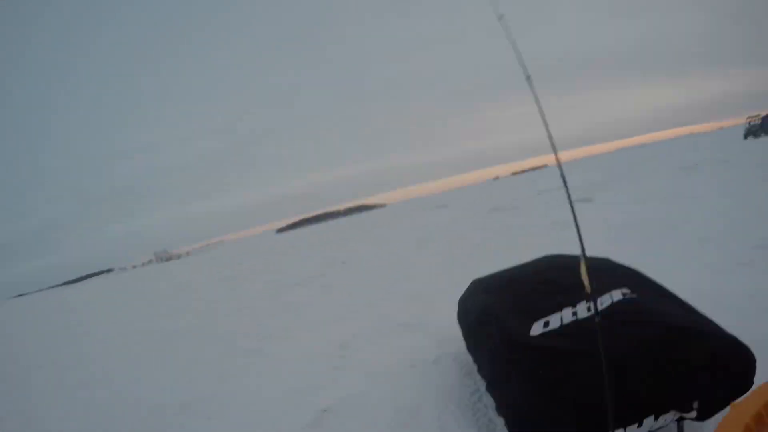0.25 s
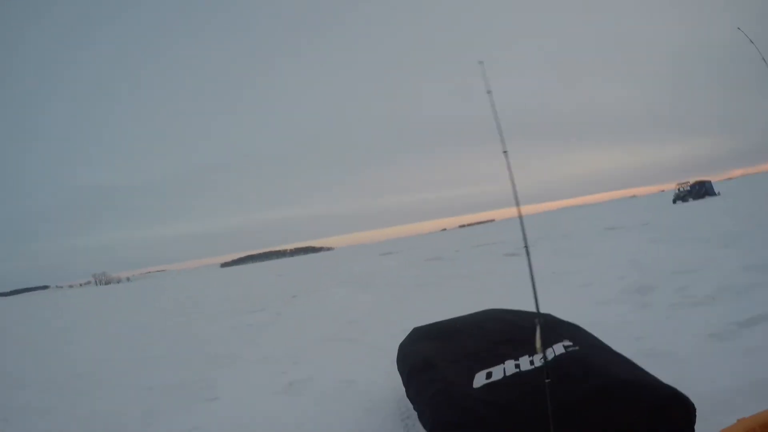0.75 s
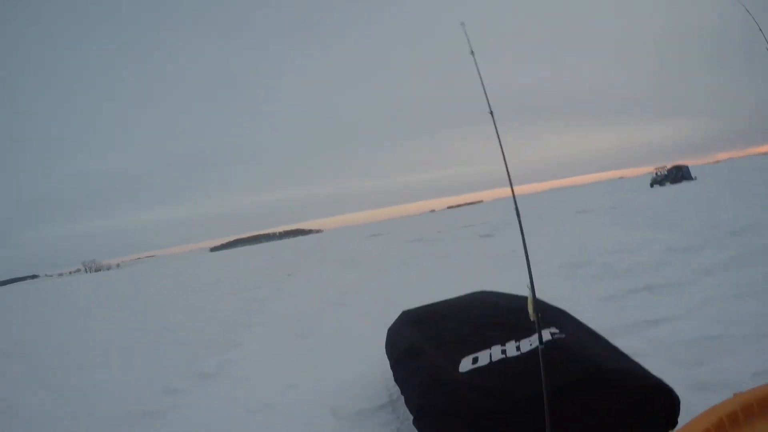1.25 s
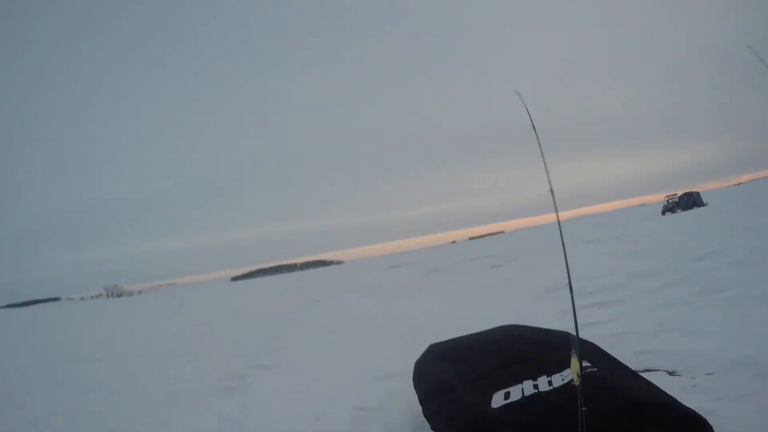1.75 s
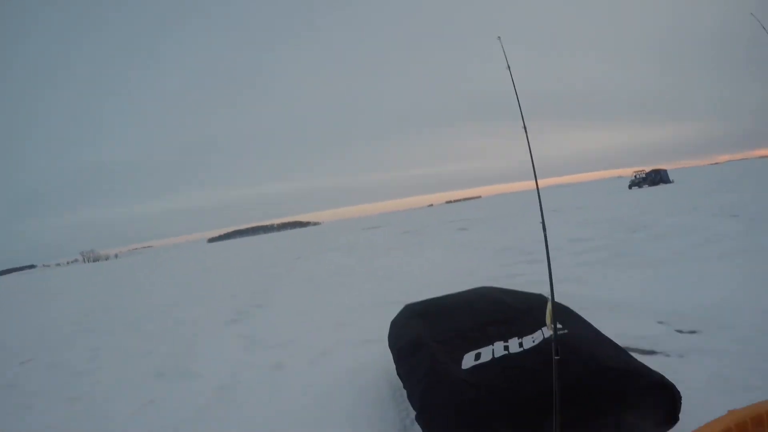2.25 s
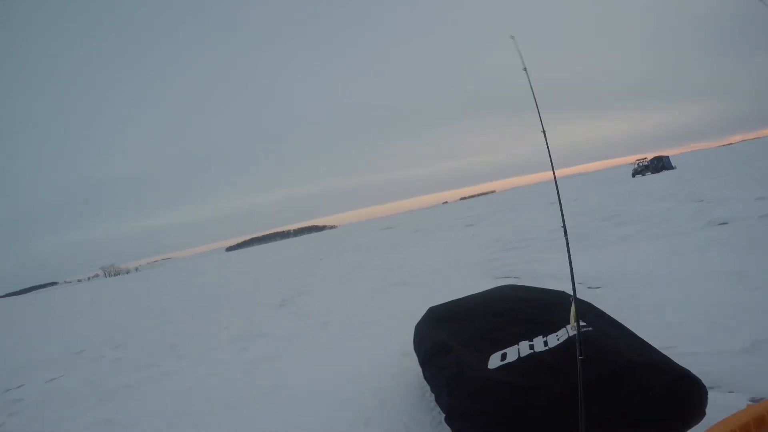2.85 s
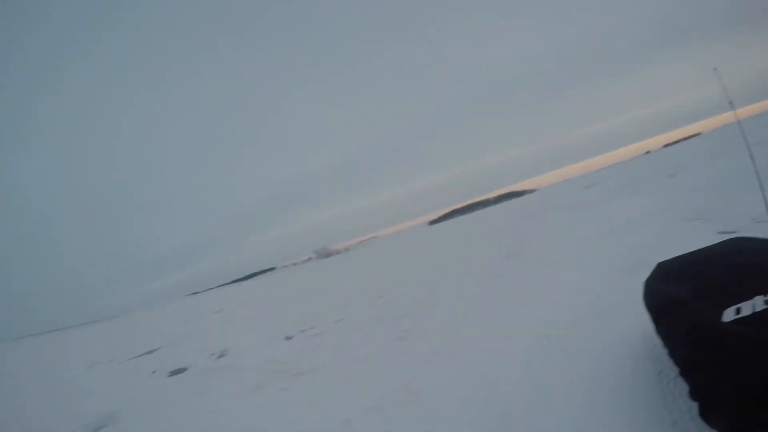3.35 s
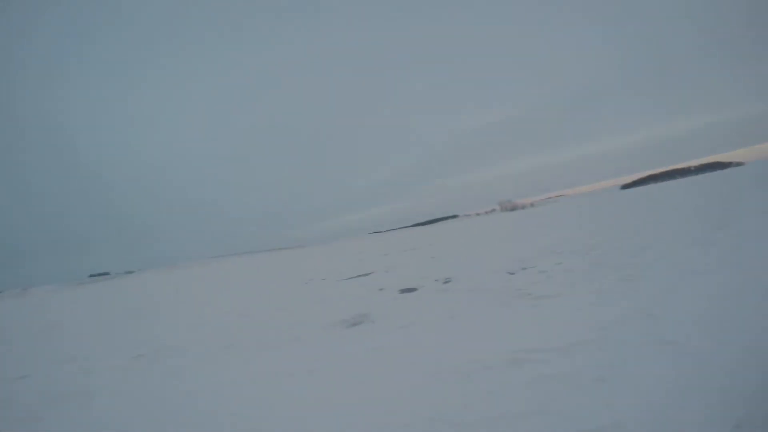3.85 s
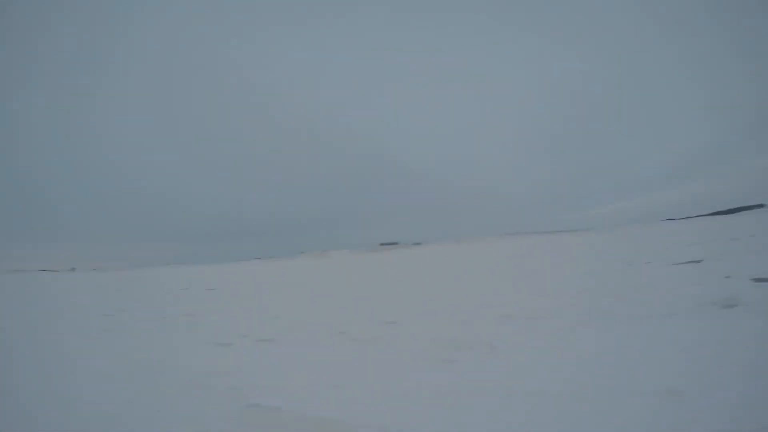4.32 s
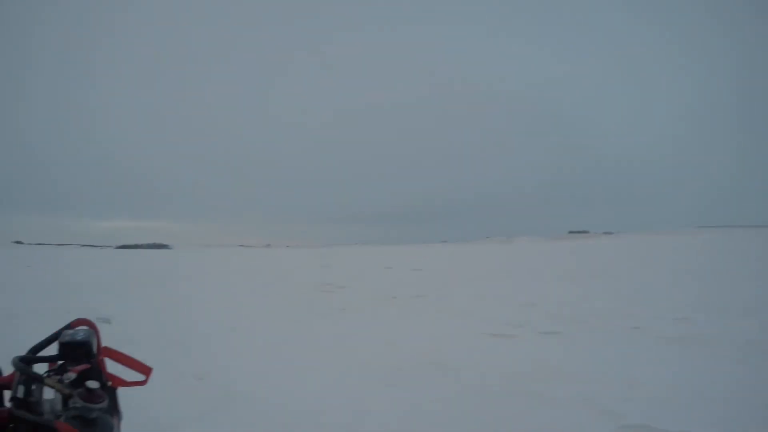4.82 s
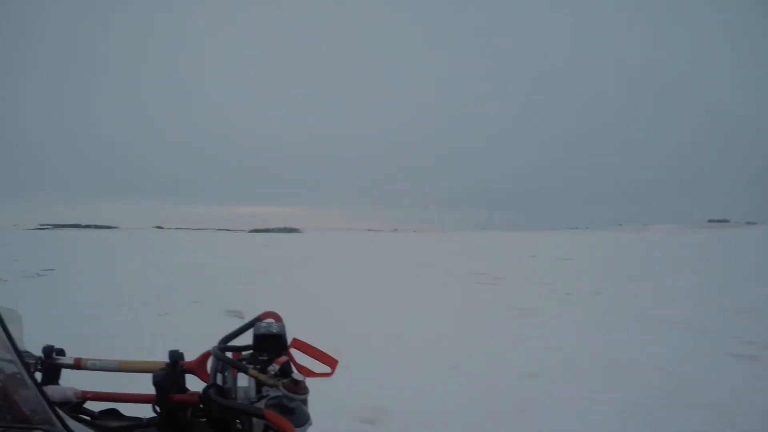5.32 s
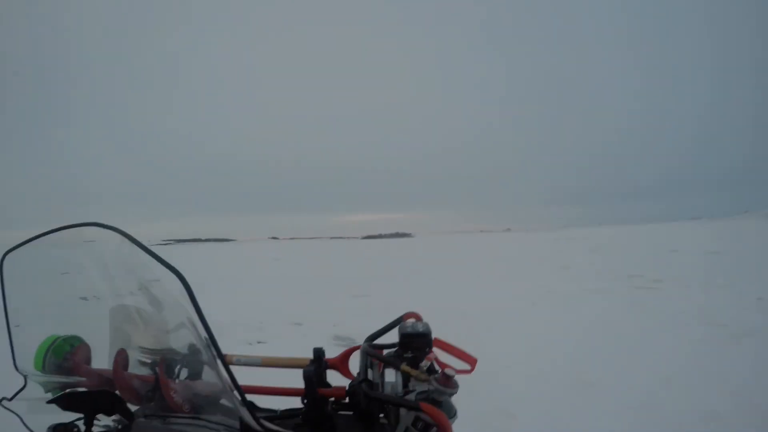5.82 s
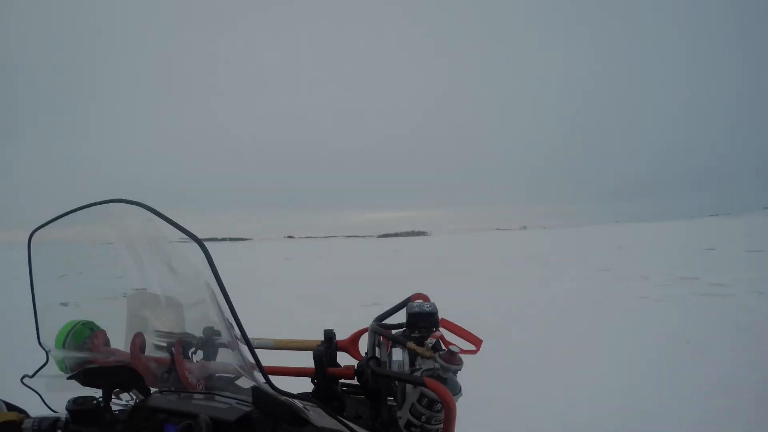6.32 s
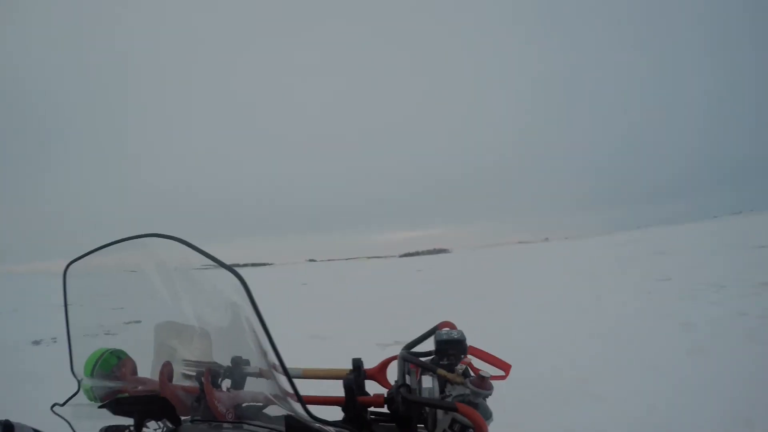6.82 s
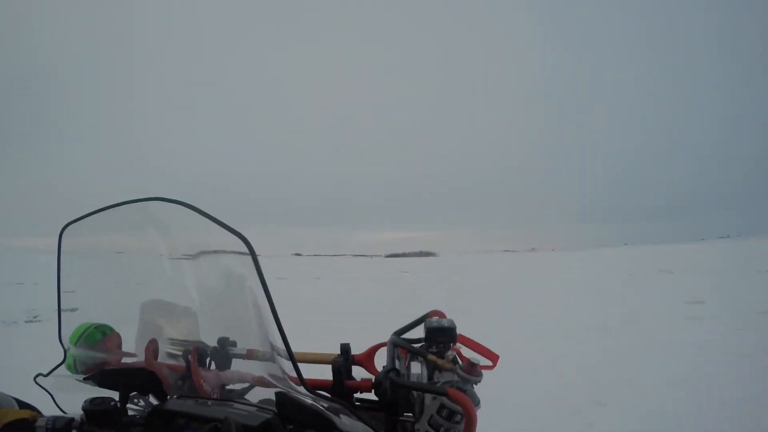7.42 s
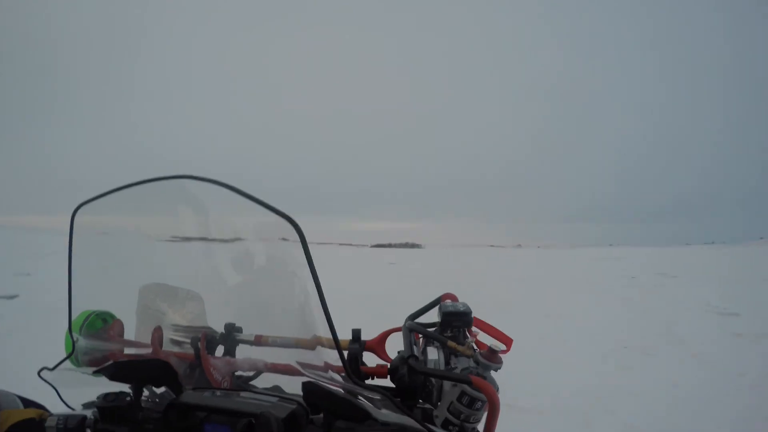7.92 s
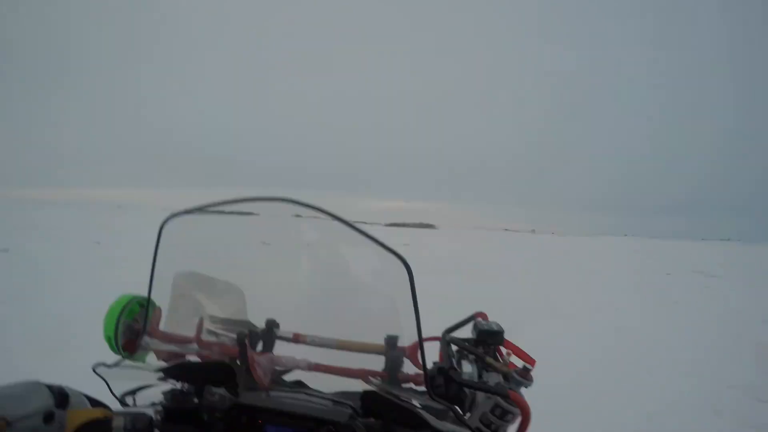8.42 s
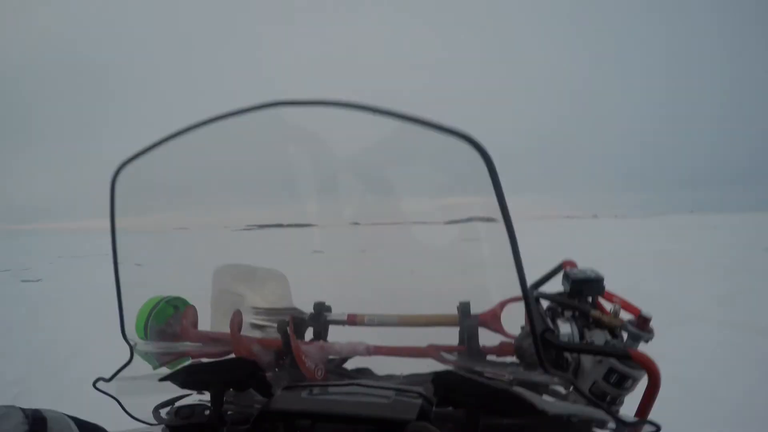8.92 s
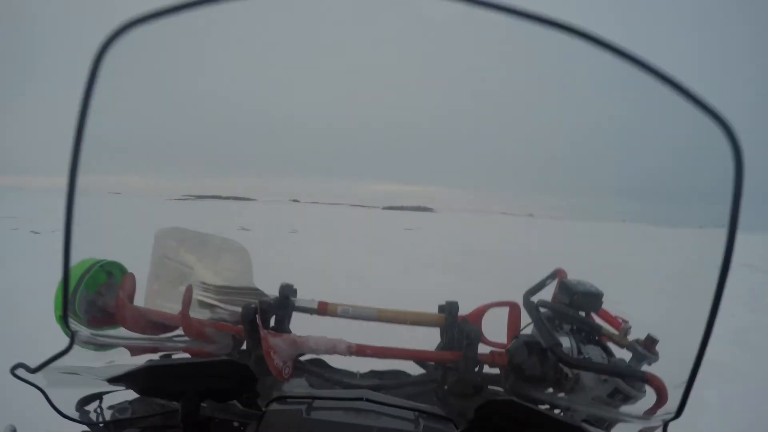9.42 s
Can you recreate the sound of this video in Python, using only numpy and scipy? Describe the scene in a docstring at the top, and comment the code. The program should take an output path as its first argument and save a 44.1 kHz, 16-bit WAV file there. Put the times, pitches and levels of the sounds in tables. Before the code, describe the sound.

Steady rough snowmobile idle creeping slightly upward, heard through a muffled body-worn microphone with wind rumble, clothing rustle and sharp handling knocks on its case.

```python
"""A snowmobile engine idles and slowly picks up speed, heard by a cased microphone worn on the head.
Exhaust and whine are summed multiples of the firing rate; puff and metal clatter are noise pulsing with it.
The wearer turns towards the machine. Wind and movement rumble in the case and clothing rustles: shaped noise.
Knocks, scrapes and taps on the plastic housing excite its resonances; ticks are short decaying sines."""
import sys
import numpy as np
from scipy import signal
from scipy.fft import rfft, irfft, next_fast_len
from scipy.io import wavfile
from scipy.ndimage import uniform_filter1d, minimum_filter1d, map_coordinates

SR = 44100
rng = np.random.default_rng(int(sys.argv[2]) if len(sys.argv) > 2 else 0)


def transcribe(u):
    """Save the signal u as a 16-bit wav file named by the first command-line argument.

    u: samples, shape (n,) or (channels, n), limited to [-1, 1]; the rate is SR.
    q: integer samples, one column per channel.
    """
    v = np.clip(np.atleast_2d(u).T, -1, 1)
    q = np.round(v * 32767).astype(np.int16)
    wavfile.write(sys.argv[1], SR, q)


N = 426005


def amp(db):
    """Decibels to gain."""
    return 10 ** (np.asarray(db) / 20)


def unit(x):
    """Scaled to rms 1."""
    return x / np.sqrt(np.mean(x ** 2) + 1e-20)


def curves(rows):
    """One value per sample for each column after the time."""
    time_s, *columns = np.transpose(rows)
    return [np.interp(np.arange(N) / SR, time_s, column) for column in columns]


def wobble(rate_hz, step=1):
    """Smooth random curve, rate_hz knots a second, one value every step samples."""
    coarse = np.arange(0, N + 128, 128)
    knots = rng.standard_normal(int(N * rate_hz / SR) + 4)
    smooth = map_coordinates(knots, [coarse * rate_hz / SR])
    return np.interp(np.arange(0, N, step), coarse, smooth)


def filtered(x, response):
    """x filtered by a complex response of frequency."""
    size = next_fast_len(N + SR // 2)
    return irfft(rfft(x, size) * response(np.fft.rfftfreq(size, 1 / SR)), size)[:N]


def modes(table):
    """Causal response of a set of resonances, alternating in sign."""
    def response(f):
        total = 0
        for k, (center_hz, width_hz, db) in enumerate(table):
            damping = 1j * f * width_hz
            total = total + (-1) ** k * amp(db) * damping / (center_hz ** 2 - f * f + damping)
        return total
    return response


def rush(spectrum, patchy_db, gate=1):
    """Gated, spectrally shaped noise of rms 1 with time-frequency patches of random gain."""
    z = signal.stft(rng.standard_normal(N + 512), nperseg=512)[2]
    field = uniform_filter1d(rng.standard_normal(z.shape), 5, 0)
    field = uniform_filter1d(field, 12, 1)
    x = signal.istft(z * amp(patchy_db * unit(field)), nperseg=512)[1][:N] * gate
    f, db = np.transpose(spectrum)
    return unit(filtered(x, lambda hz: amp(np.interp(np.log(hz + 1), np.log(f + 1), db))))


def swell(start_s, length_s, edge_s):
    """Sample numbers and gain of a soft rise, hold and fall."""
    first = max(0, round((start_s - edge_s) * SR))
    last = min(N, round((start_s + length_s + edge_s) * SR))
    at = np.arange(first, last)
    ramp = np.minimum(at / SR - start_s, start_s + length_s - at / SR) / edge_s
    return at, np.sin(np.pi / 4 * (np.clip(ramp, -1, 1) + 1)) ** 2


def bursts(rows, rest_db, edge_s):
    """Gain curve: swells added in power to a resting level."""
    power = np.full(N, amp(rest_db) ** 2)
    for start_s, length_s, db in rows:
        at, gain = swell(start_s, length_s, edge_s)
        power[at] += (amp(db) * gain) ** 2
    return np.sqrt(power)


# wind rumble spectrum: (frequency [Hz], relative density [dB])
RUMBLE_SPECTRUM = [(4.7, -36), (8.0, 4), (38, 0.5), (70, -13.5), (81, -22), (108, -18.5), (140, -27),
                   (180, -63), (310, -120)]
# gusts on the case: (start [s], length [s], rumble level [dB])
GUSTS = [(0.085, 0.21, -21), (0.34, 0.116, -21), (0.743, 0.079, -20.5), (1.16, 0.048, -19),
         (1.522, 0.088, -22), (1.721, 0.036, -19), (2.645, 0.04, -26), (3.587, 0.041, -21),
         (3.78, 0.034, -28), (3.877, 0.034, -27.5), (3.932, 0.033, -26), (4.175, 0.05, -22),
         (4.317, 0.038, -28), (4.37, 0.039, -26), (4.536, 0.03, -28), (4.698, 0.084, -26),
         (5.797, 0.04, -23.5), (6.063, 0.12, -21), (6.238, 0.13, -25), (6.432, 0.09, -25),
         (6.612, 0.034, -24), (6.806, 0.17, -20), (7.01, 0.11, -22), (7.26, 0.081, -23),
         (7.394, 0.042, -23), (7.482, 0.074, -27), (7.646, 0.05, -25.5), (7.807, 0.033, -19),
         (8.12, 0.12, -20), (8.458, 0.061, -19.5), (8.666, 0.064, -21), (8.779, 0.055, -20),
         (9.208, 0.12, -24.5), (9.373, 0.04, -23), (9.469, 0.032, -21)]
CALM_DB, GUST_EDGE_S = -31, 0.04


def wind():
    """Low pressure swings on the case, their short-term level partly evened out, then gusted."""
    push = rush(RUMBLE_SPECTRUM, patchy_db=1.4)
    size = np.sqrt(np.abs(uniform_filter1d(push ** 2, SR // 12)) + .05)
    return bursts(GUSTS, CALM_DB, GUST_EDGE_S) * unit(push / size ** 0.53)


# movement noise spectrum: (frequency [Hz], relative density [dB])
SHUFFLE_SPECTRUM = [(40, -42), (85, 1.5), (130, -7.5), (200, -2.5), (330, -18), (600, -25), (1000, -70)]
# body movements: (start [s], length [s], level [dB])
MOVES = [(0, 0.3, -36.5), (1.4, .25, -39), (2.1, .15, -47), (3.42, .15, -46), (6.1, .12, -55),
         (6.78, 0.26, -37), (7.9, 0.26, -44), (8.22, 0.52, -35.5), (8.72, 0.44, -39), (9.55, 0.13, -37)]
REST_DB, MOVE_EDGE_S = -49, 0.048


def movement():
    """Body movement carried through the mount as swells of low noise."""
    return bursts(MOVES, REST_DB, MOVE_EDGE_S) * rush(SHUFFLE_SPECTRUM, patchy_db=1.0)


# fabric hiss spectrum: (frequency [Hz], relative density [dB])
RUSTLE_SPECTRUM = [(2650, -29), (4500, -4), (5660, -4.5), (7040, -1.5), (8060, -9.5), (9870, -9.5),
                   (14900, -27.5), (15600, -29)]
# strokes of fabric: (start [s], length [s], rustle level [dB])
STROKES = [(.33, 0.072, -61), (.46, 0.11, -50), (.63, .05, -50), (.72, .05, -55), (.8, 0.11, -57),
           (1.0, 0.081, -58), (1.13, .1, -60), (1.34, 0.23, -50), (1.62, 0.14, -50.5), (1.84, .22, -52.5),
           (2.14, .06, -51), (2.27, 0.13, -49), (2.45, 0.13, -51.5), (2.7, 0.11, -51), (2.95, .12, -53),
           (3.16, .1, -54), (3.4, .65, -60), (4.25, 0.23, -55), (4.52, 0.71, -56), (5.34, .1, -55),
           (6.17, .1, -57), (6.84, .19, -54.5), (7.95, 0.079, -60)]
# thin scuff spectrum: (frequency [Hz], relative density [dB])
SCUFF_SPECTRUM = [(6500, -60), (8800, -14), (9900, 0), (10800, -12), (12500, -14), (15000, -30)]
# thin, high scuffs: (start [s], length [s], level [dB])
SCUFFS = [(3.16, .17, -59), (3.4, .08, -60), (3.57, .13, -59)]
STILL_DB, STROKE_EDGE_S = -60.5, 0.027


def cloth():
    """Stiff fabric rubbing: bright, grainy hiss in strokes, and a few thinner scuffs."""
    grain = amp(2.0 * wobble(60) + 1.0 * wobble(18))
    hiss = unit(grain * rush(RUSTLE_SPECTRUM, patchy_db=4.0))
    strokes = bursts(STROKES, STILL_DB, STROKE_EDGE_S) * hiss
    scuffs = bursts(SCUFFS, -120, STROKE_EDGE_S) * rush(SCUFF_SPECTRUM, patchy_db=1.5)
    return strokes + scuffs


# tiny high ticks: (time [s], level [dB])
TICKS = [(6.774, -56), (6.8423, -47), (6.8793, -50), (6.9114, -50), (6.9177, -42), (6.9344, -52),
         (6.9546, -50.5), (6.9614, -51), (6.9795, -51), (6.9974, -48), (7.0065, -44), (7.0174, -56),
         (7.0614, -52)]


def ticks():
    """Something small and hard chatters near one high pitch: short decaying sines."""
    out, t = np.zeros(N), np.arange(SR // 100) / SR
    for time_s, db in TICKS:
        envelope = amp(db - 60 * t / 0.015) * (1 - np.exp(-t / .0004))
        pitch_hz = rng.normal(11050, 150)
        out[round(time_s * SR):][:len(t)] += envelope * np.sin(2 * np.pi * pitch_hz * t)
    return out


# housing resonances, low, mid and high: (frequency [Hz], width [Hz], level [dB])
CASE_LOW = [(300, 120, -14), (545, 130, -6.5), (753, 170, 3.5), (1057, 130, 4)]
CASE_MID = [(1306, 266, -2), (1666, 146, 5.5), (2208, 126, -0.5)]
CASE_HIGH = [(2870, 690, 3), (3750, 300, 4.5), (4200, 280, 5.5), (4980, 166, 5), (5766, 163, 5),
             (9400, 1200, -12)]


def housing(low, mid, high):
    """Plastic housing: three resonance groups; soft contact passes little of the top octave."""
    rung = filtered(low, modes(CASE_LOW)) + filtered(mid, modes(CASE_MID)) + filtered(high, modes(CASE_HIGH))
    return filtered(rung, lambda hz: 1 / (1 + 1j * hz / 11000) ** 4)


# light taps: (time [s], level [dB])
TAPS = [(0.477, -22), (0.6853, -23.5), (1.598, -19.5), (1.64, -30.5), (9.151, -13), (9.45, -20)]
# light rubbing: (start [s], length [s], level [dB])
RUBS = [(6.101, 0.15, -49), (6.367, .045, -42), (6.459, .15, -46)]
TAP_S = .0015  # hold, and each edge
SCRAPE_EDGE_S = .012


def taps():
    """Fingertips tap and rub the housing gently; only its strongest mid mode answers."""
    push = np.zeros(N)
    mode_hz = CASE_MID[1][0]
    for time_s, db in TAPS:
        at, gain = swell(time_s, TAP_S, TAP_S)
        push[at] += amp(db) * gain * np.sin(2 * np.pi * mode_hz * (at / SR - time_s))
    for start_s, length_s, db in RUBS:
        at, gain = swell(start_s, length_s, SCRAPE_EDGE_S)
        slips = rng.standard_normal(len(at)) * (rng.random(len(at)) < .02)
        push[at] += amp(db + 29.5) * gain * slips
    return filtered(push, modes(CASE_MID[1:2]))


# drags over the housing: (start [s], length [s], scrape level [dB], treble relative to scrape [dB])
SCRAPES = [(0.196, 0.072, -46, 0), (0.294, 0.08, -51, -6), (.375, 0.026, -36, -7), (0.407, .05, -47, -16),
           (0.473, .08, -50, 4), (1.495, 0.036, -41.5, -8), (4.035, .025, -56, 10),
           (8.255, 0.066, -44.5, -17), (8.401, .06, -47, -9), (8.519, 0.056, -41, -10),
           (8.568, .045, -34, -18), (8.622, 0.033, -24, -10), (8.689, 0.061, -36, -12),
           (8.75, .04, -44, -12), (8.799, 0.025, -32, -21)]


def scrapes():
    """Stick and slip: sparse spikes of uneven size ring the housing."""
    body, treble = np.zeros((2, N))
    for start_s, length_s, db, treble_db in SCRAPES:
        at, gain = swell(start_s, length_s, SCRAPE_EDGE_S)
        spikes = rng.standard_normal(len(at)) * (rng.random(len(at)) < .03)
        slips = spikes * gain * amp(db + 29.5)
        body[at] += slips
        treble[at] += amp(treble_db) * slips
    return housing(body, body, treble)


# knocks: (time [s], level [dB], low modes re level [dB], treble re level [dB],
#          thump level [dB], contact time scale [s])
KNOCKS = [(0.173, -39, -13, 9.5, -31, 0.0033), (0.2922, -8, -10, 2.5, -32, 0.0023),
          (0.2979, -14, -20, -4.5, -32, 0.0062), (0.381, -21, -16, -10, -25, 0.0026),
          (0.3882, -18, -16, -19, -45, 0.0033), (0.455, -29, -16, -18, -37, 0.002),
          (0.4652, -19.5, -19, -10, -40, 0.0029), (1.493, -27, -16, -19, -23.5, 0.002),
          (6.6064, -31, -15.5, -24, -23, 0.0022), (6.6269, -3, -12.5, -23, -16.5, 0.0018),
          (6.8398, -36, -3, -14, -25, 0.0018), (7.8235, -28, -1.5, -21, -21, 0.0025),
          (8.502, -27.5, -6, -16, -29, 0.0022), (8.538, -14, -12, -15.5, -31, 0.003),
          (8.587, -25, 0, -22, -23, 0.0027), (8.5967, 4, -11, -12, -30, 0.0043),
          (8.6162, -7.5, -6, -16, -20, 0.0051), (8.6242, -11.5, -4, -1, -17, 0.006),
          (8.6324, -9, -7, -3, -14, 0.0025), (8.637, -12, -9, 1, -13.5, 0.0037),
          (8.6435, -14, -9, -6, -22, 0.003), (8.6884, -18, -9, -18, -32.5, 0.002),
          (8.7004, -11.5, -16, -9.5, -33, 0.0027), (8.7104, -20, -7, -4, -32, 0.002),
          (8.7145, -13, -11, -2, -41, 0.003), (8.7217, -13.5, -4, -7, -28, 0.0032),
          (8.736, -13, -12, -13, -14.5, 0.0026), (8.7494, -17, -16, -12, -34, 0.002),
          (8.757, -14, -13, -19, -35, 0.002), (8.763, -26, -6, -8, -35, 0.002),
          (8.776, -27, -3, -20, -34, 0.002), (8.7884, -15, -6, -8, -34, 0.0046),
          (8.7994, -7.5, -6, 0.5, -8.5, 0.0055), (8.821, -20.5, -9, -7, -22, 0.0017),
          (9.0172, -23.5, -2, -10, -27, 0.0026), (9.0317, -5, -3, -4, -13.5, 0.0028),
          (9.0978, -20.5, -7, -6, -24, 0.0018), (9.1511, -16.5, -14, -7, -21, 0.002),
          (9.2262, -21, -14, -4.5, -37, 0.0027), (9.263, -22, -9, -7, -32, 0.0028),
          (9.3637, -16, -12.5, -9, -38, 0.0033)]


def knocks():
    """A sharp blow with a short noise rattle rings the housing and flexes the mount in a thump."""
    low, mid, high, thump = np.zeros((4, N + SR))
    t = np.arange(SR // 16) / SR
    flex = np.sin(2 * np.pi * 115 * t) * (1 - np.exp(-t / 0.0011))
    for time_s, db, low_db, high_db, thump_db, contact_s in KNOCKS:
        push = rng.standard_normal((3, len(t))) * np.exp(-(t / contact_s / 1.4) ** 2)
        push /= np.linalg.norm(push, axis=1)[:, None]
        push *= np.array([[.7], [.7], [1.3]])  # rattle: low, mid, high
        push[:, 12] += [1.3, 1.3, .6]  # blow: low, mid, high
        span = slice(round(time_s * SR), round(time_s * SR) + len(t))
        low[span] += amp(db + low_db + 31.0) * push[0]
        mid[span] += amp(db + 26.0) * push[1]
        high[span] += amp(db + high_db + 25.0) * push[2]
        thump[span] += amp(thump_db + 7.5 - 60 * t / 0.053) * flex
    return housing(low[:N], mid[:N], high[:N]) + thump[:N]


def stack(turn, shade, orders, flutter_db, drift_rad, spread_rad, knee):
    """Wavering cycle multiples, rms 1; spread_rad smears the pulse in time, mostly below knee."""
    step = 6  # synthesized at SR / step
    turn, shade = turn[::step], shade[::step]
    tones = 0
    for k, open_db, shaded_db in orders:
        level_db = open_db + shade * (shaded_db - open_db) + flutter_db * wobble(4.6, step)
        smear = spread_rad * (k * k - .82 * max(k - knee, 0) ** 2)
        tones = tones + amp(level_db) * np.cos(k * turn + smear + drift_rad * wobble(5, step))
    return unit(signal.resample_poly(tones, step, 1)[:N])


# exhaust orders: (multiple of the cycle [-], relative level in the open [dB], shaded [dB])
NOTE_ORDERS = [(1, -37, -35), (2, -31, -32), (3, -44, -48), (4, -53, -56), (5, -43, -47), (6, -39, -38),
               (7, -41, -47), (8, -41, -46), (9, -47, -49), (10, -51, -50), (11, -49, -50), (12, -61, -61),
               (13, -61, -60), (14, -63, -67), (15, -62, -70), (16, -63, -64), (17, -61, -66),
               (18, -57, -65), (19, -54, -65), (20, -59, -63), (21, -62, -69), (22, -67, -68)]
# puff spectrum: (frequency [Hz], relative density [dB])
PUFF_SPECTRUM = [(60, -60), (130, -2), (170, 0), (250, -2), (320, -5), (360, -8), (550, -10), (650, -14),
                 (900, -20), (1300, -60)]


def exhaust(turn, shade):
    """One exhaust pulse a cycle as harmonics, with turbulent noise pulsing under it."""
    note = stack(turn, shade, NOTE_ORDERS, flutter_db=1.2, drift_rad=.1, spread_rad=-1.2, knee=8)
    puff = rush(PUFF_SPECTRUM, patchy_db=1.2, gate=1 + .3 * np.cos(turn))
    return amp(5.5) * note + amp(-13.5) * puff


# whine orders: (multiple of the cycle [-], relative level in the open [dB], shaded [dB])
WHINE_ORDERS = [(30, -16, -15), (32, -15, -16), (34, -9, -15), (37, -11, -9), (38, -2, -2), (40, -4, -5),
                (41, -4, -12), (42, 1, 0), (46, -3, -5), (48, -8, -14), (49, -9, -14), (54, -13, -15),
                (59, -5, -16), (62, -6, -18), (63, -4, -17), (64, -5, -16)]


def whine(turn, shade):
    """High multiples of the firing cycle, wavering in level and phase."""
    return stack(turn, shade, WHINE_ORDERS, flutter_db=1.5, drift_rad=.2, spread_rad=.7, knee=70)


# clatter spectra, low, mid, high facing away, high facing: (frequency [Hz], relative density [dB])
LOW_SPECTRUM = [(450, -33), (700, -6), (800, -10.5), (1050, -7), (1300, -0.5), (1550, -5), (2000, -47),
                (3400, -120)]
MID_SPECTRUM = [(880, -16), (1500, -3), (1650, -7), (1810, 1), (2070, -12.5), (2200, -9.5), (2860, -43),
                (4840, -120)]
HIGH_SPECTRUM = [(1180, -43), (2000, -3), (2090, -13), (2390, 3.5), (3140, -4.5), (4020, 0.5), (4930, -10),
                 (5750, -9), (6260, -10), (6930, -11), (7480, -11), (8220, -22), (9580, -18),
                 (13100, -26.5), (15300, -28)]
HIGH_FACING_SPECTRUM = [(1180, -28), (2000, -8), (2430, 1.5), (2600, -0.5), (2980, -2), (3140, -5.5),
                        (4190, -5.5), (4930, -23), (5750, -9.5), (6050, -11), (8150, -26.5), (8950, -25),
                        (10200, -30.5), (13200, -30), (15300, -40)]
# treble resonance, applied twice: (frequency [Hz], width per pass [Hz], level per pass [dB])
RING = [(8680, 130, 0)]


def clatter(turn, facing):
    """Low, mid and high metal noise beating with the shaft; facing crossfades the high spectrum."""
    beat = 1 + 0.1 * np.cos(turn - 1.2)
    low, mid = rush(LOW_SPECTRUM, 1.7, beat), rush(MID_SPECTRUM, 1.2, beat)
    away = np.sqrt(1 - facing) * rush(HIGH_SPECTRUM, 2.4, beat)
    towards = np.sqrt(facing) * rush(HIGH_FACING_SPECTRUM, 1.4, beat)
    ring = unit(filtered(rng.standard_normal(N), lambda f: modes(RING)(f) ** 2))
    return low, mid, away + towards + amp(-30.5) * ring


# idle hunting as it climbs: (time [s], firing cycles [Hz])
SPEED = [(0, 26.65), (0.45, 26.55), (0.75, 26.78), (1.07, 26.38), (1.5, 27.27), (1.67, 27.02), (2.12, 27.1),
         (2.47, 27.72), (2.75, 27.5), (3.2, 28.7), (3.48, 28.2), (3.92, 29.3), (4.1, 29.33), (4.52, 29.73),
         (4.8, 29.55), (4.96, 29.22), (5.2, 29.18), (5.42, 28.93), (5.71, 29.62), (5.9, 29.35),
         (6.12, 29.42), (6.44, 28.85), (6.74, 29.14), (7.52, 28.78), (7.96, 29.4), (8.26, 28.1),
         (8.6, 28.85), (8.85, 29.02), (9.16, 28.43), (9.47, 29.55), (9.66, 29.78)]
# levels as the head turns: (time [s], exhaust [dB], whine [dB], low clatter [dB],
#                            mid clatter [dB], high clatter [dB])
ENGINE_LEVELS = [(0, -35, -67, -47.5, -49.5, -40), (.67, -35, -61, -57, -50, -43),
                 (1.5, -35.5, -59, -54, -52.5, -44.5), (2.1, -35, -62, -54.5, -54, -47),
                 (3.0, -35.5, -58, -53.5, -52.5, -45), (3.6, -35.5, -55, -47.5, -48, -41.5),
                 (3.9, -35.5, -51.5, -48, -47, -42), (4.2, -35, -44.5, -52, -48.5, -44.5),
                 (4.65, -34.5, -47, -51.5, -46.5, -43), (5.1, -36, -51, -52, -49, -43),
                 (5.42, -36.5, -49, -52.5, -49.5, -43.5), (5.7, -36.5, -45, -52, -56, -42),
                 (6.25, -34, -47, -53.5, -50, -41.5), (6.55, -34.5, -53, -48.5, -49, -42),
                 (7.3, -34, -52.5, -51.5, -54.5, -42), (8.2, -34.5, -52, -52, -51, -40.5),
                 (8.7, -35.5, -61, -44, -41, -42), (9.05, -38.5, -56, -44, -45.5, -36),
                 (9.3, -36.5, -62, -48, -50.5, -38), (9.66, -36.5, -59, -43, -45, -36)]
# head turn, and the body shading the exhaust late in it: (start [s], end [s])
TURN_S, SHADE_S = (3.3, 5.6), (4.05, 5.36)


def engine():
    """Exhaust, whine and clatter locked to one firing phase, balanced as the head turns."""
    exhaust_db, whine_db, low_db, mid_db, high_db = curves(ENGINE_LEVELS)
    facing = np.interp(np.arange(N) / SR, TURN_S, (.05, .95))
    shade = np.interp(np.arange(N) / SR, SHADE_S, (0, 1))
    turn = 2 * np.pi * np.cumsum(curves(SPEED)[0]) / SR
    low, mid, high = clatter(turn, facing)
    tonal = amp(exhaust_db) * exhaust(turn, shade) + amp(whine_db) * whine(turn, shade)
    return tonal + amp(low_db) * low + amp(mid_db) * mid + amp(high_db) * high


def scene():
    """All sources at the single microphone."""
    handling = ticks() + taps() + scrapes() + knocks()
    return (wind() + movement() + cloth() + handling + engine())[None]


TOP_HZ = 15500


def record(dry):
    """Gain control ducks at loud peaks and recovers slowly; nothing passes above TOP_HZ."""
    needed = np.minimum(1, amp(2.9) / (np.abs(dry[0]) + 1e-9))
    fast = uniform_filter1d(minimum_filter1d(needed, size=441), size=221)
    keep = np.exp(-1 / (.12 * SR))  # 0.12 s time constant
    duck = signal.lfilter([1 - keep], [1, -keep], 1.4 * (1 - fast))
    slow = 1 - np.clip(duck, 0, .7)
    return filtered(dry[0] * fast * slow, lambda hz: hz < TOP_HZ)[None]


dry = scene()
out = record(dry)
transcribe(out)
```